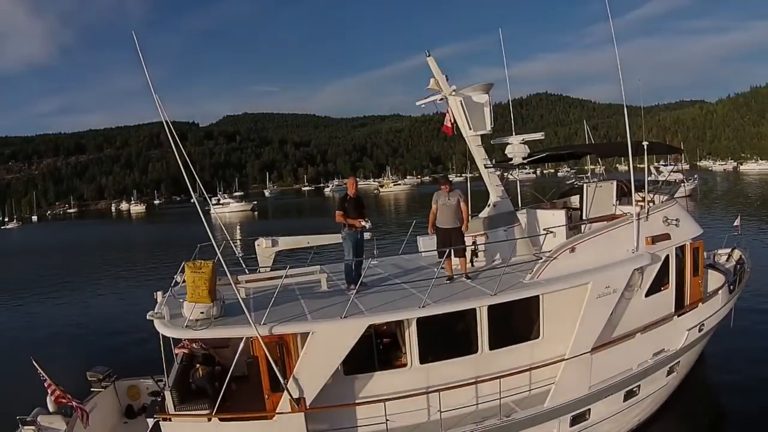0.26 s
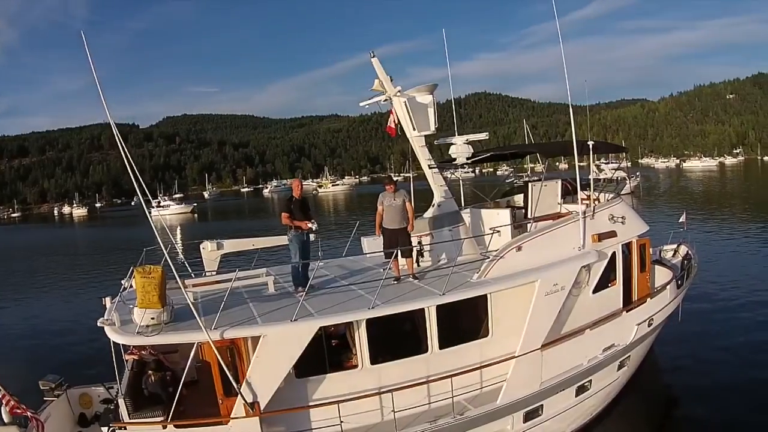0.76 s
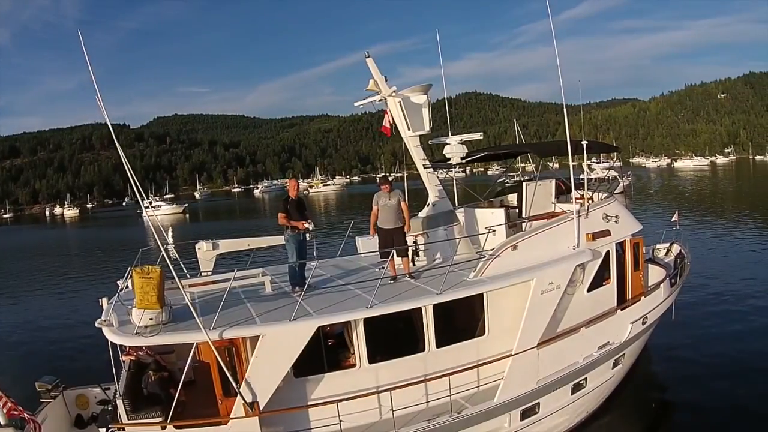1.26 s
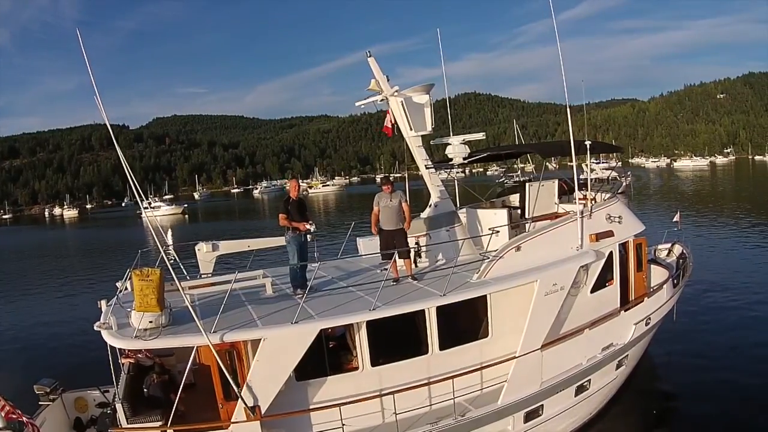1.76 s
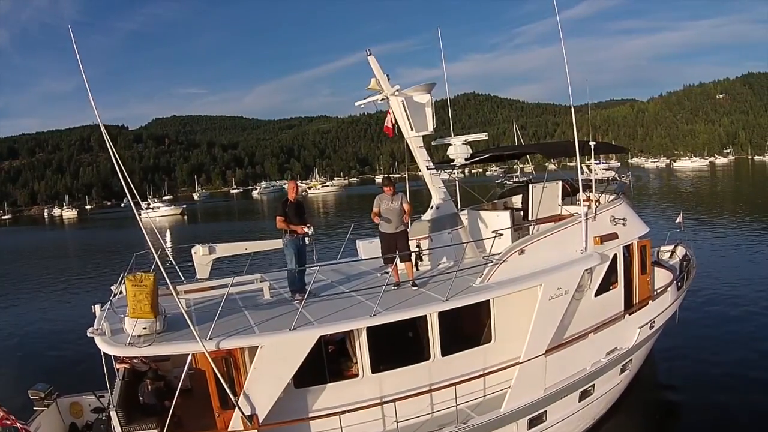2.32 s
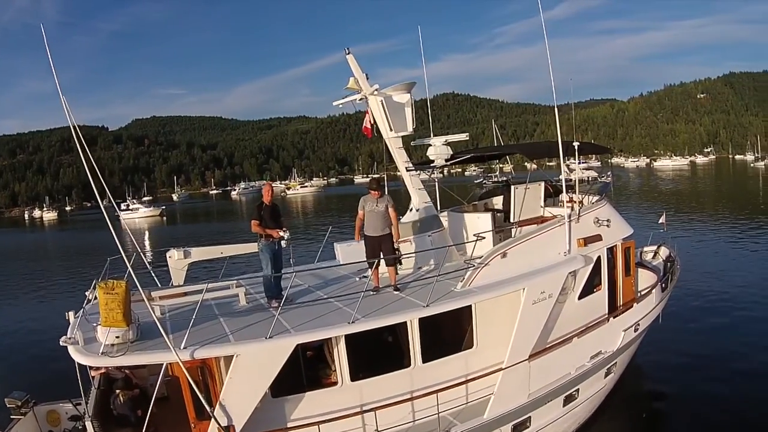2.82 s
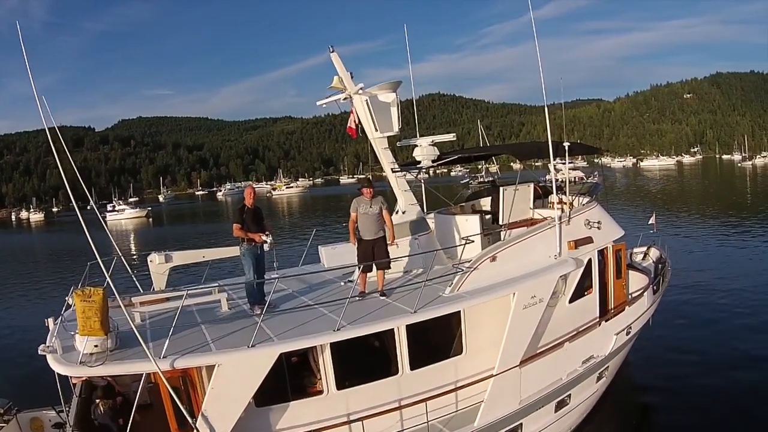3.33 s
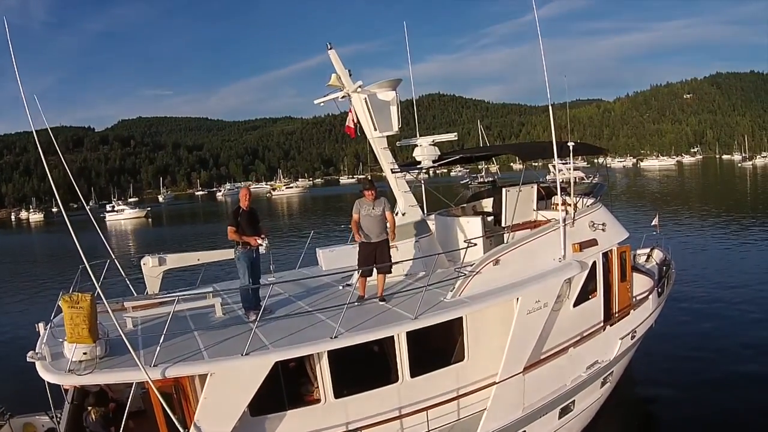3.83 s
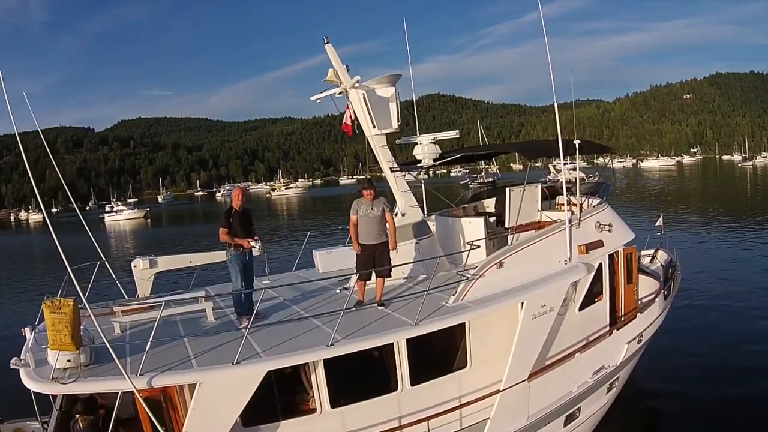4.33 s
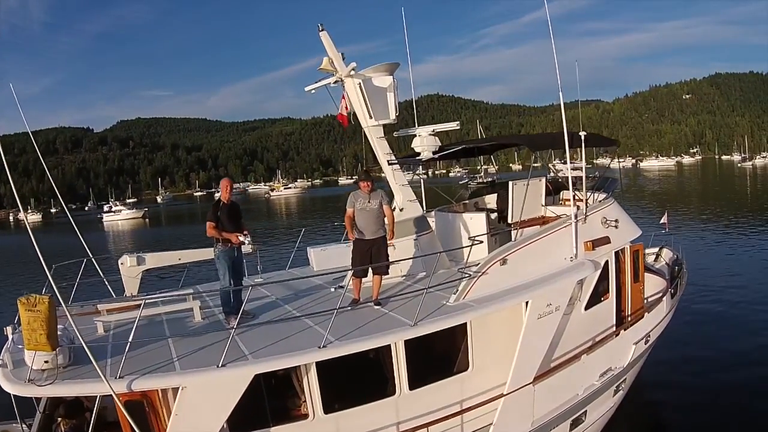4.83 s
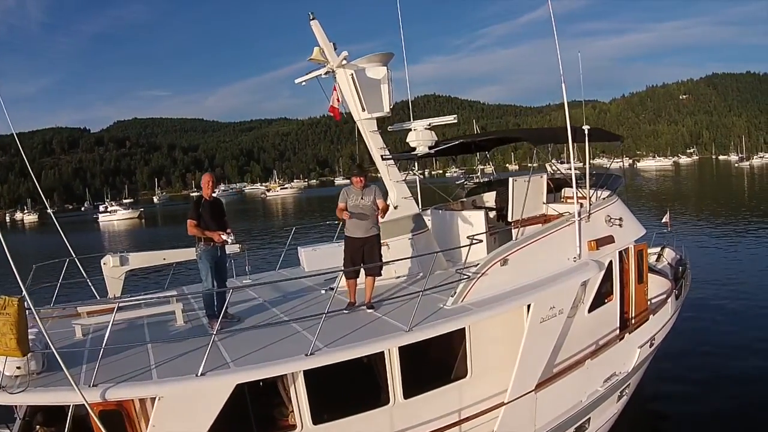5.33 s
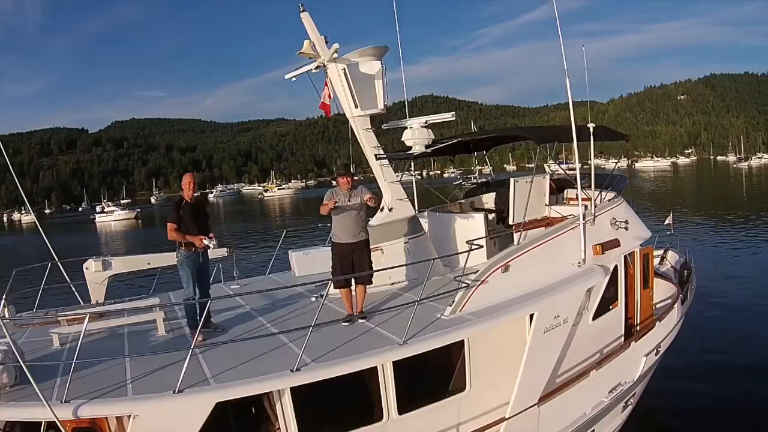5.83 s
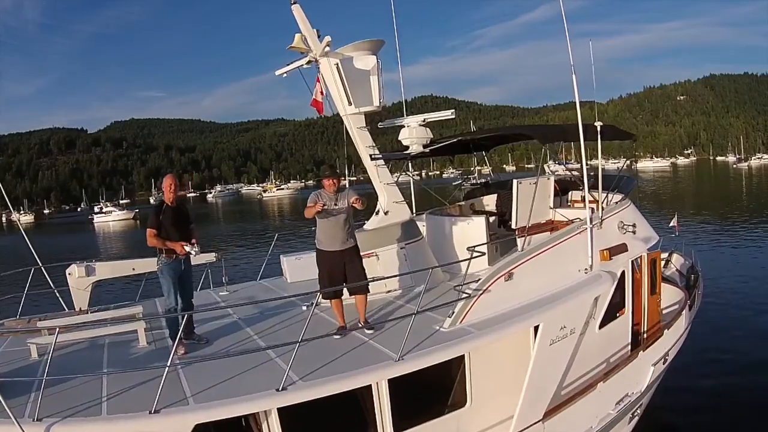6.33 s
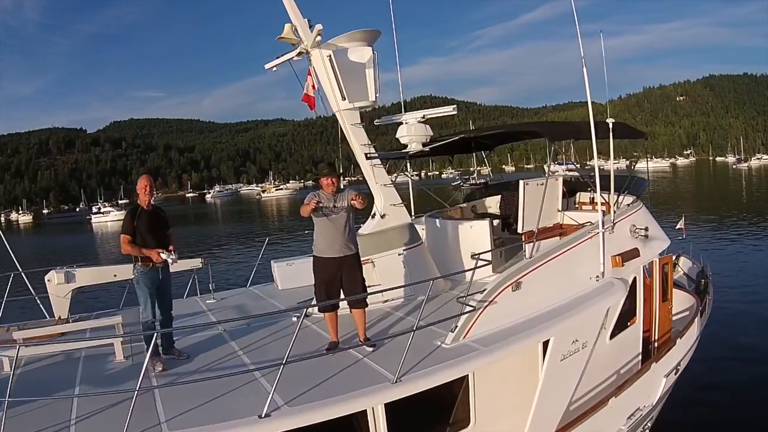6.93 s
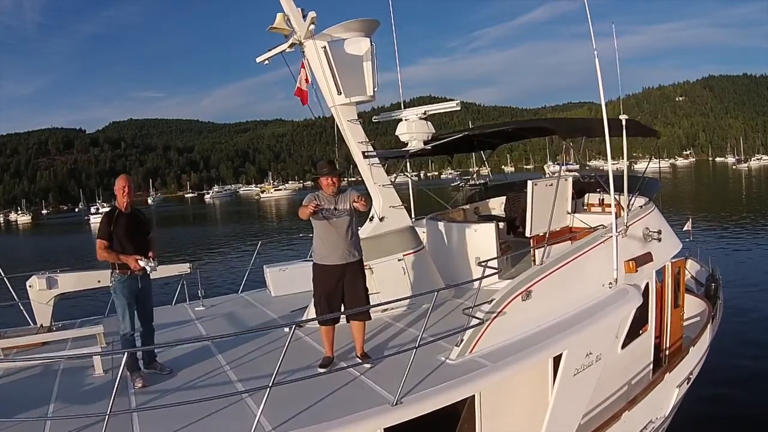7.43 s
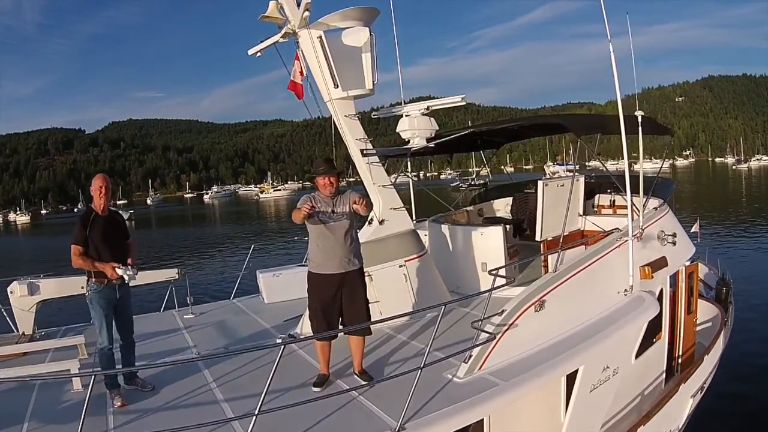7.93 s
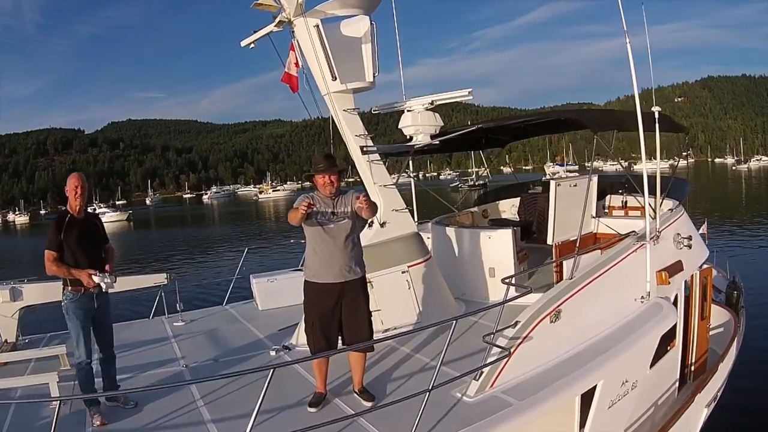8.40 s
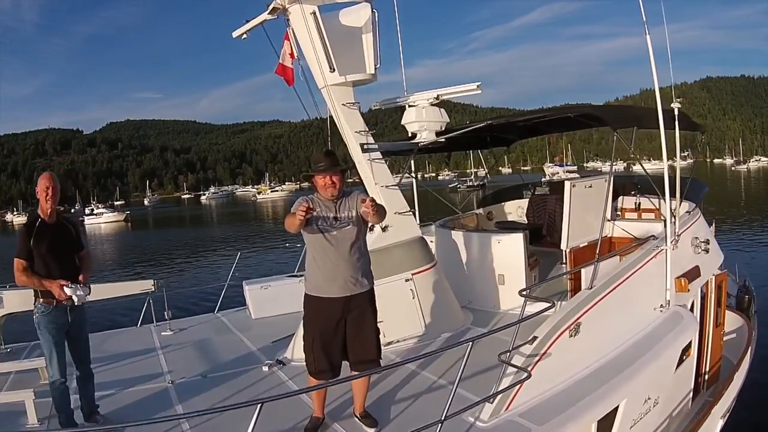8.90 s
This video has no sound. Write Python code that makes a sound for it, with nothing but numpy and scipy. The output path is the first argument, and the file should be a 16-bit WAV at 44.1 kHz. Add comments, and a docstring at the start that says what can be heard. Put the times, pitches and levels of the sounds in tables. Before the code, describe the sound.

Close, dry outdoor stereo sound of a helicopter-like rotor hovering. After initial silence it rises quickly to a steady, rapid chop with rounded thumps, crisp slaps and a soft rush of air. Low throbbing gusts come and go; blade hits alternate between tight and ragged. A very thin, slightly unsteady high whine stays in the background. It continues to the end without fading.

```python
"""A two-bladed rotor, by its sound a helicopter's, fades in and hovers close by, chopping almost eleven times a second.
Slaps and thumps: each blade cuts the tip vortex of the one before, sharp in steady air, smeared in a broken wake.
Below lie a throb of low multiples of the blade rate and the filtered-noise rush of the downwash.
A thin turbine whine, noise-modulated tones of drifting pitch, wanders on top."""
import sys
import numpy as np
from scipy import signal
from scipy.fft import rfft, irfft, next_fast_len
from scipy.io import wavfile
from scipy.ndimage import uniform_filter1d, minimum_filter1d

SR = 44100
rng = np.random.default_rng(int(sys.argv[2]) if len(sys.argv) > 2 else 0)


def digitize_waveform(pressure):
    """Quantize a signal to 16-bit integers and store it at the path in sys.argv[1].

    Rows of a 2-D input are taken as channels; values are limited to [-1, 1].
    """
    field = np.atleast_2d(pressure).T
    bounded = np.clip(field, -1, 1)
    quanta = np.round(bounded * 32767).astype(np.int16)
    wavfile.write(sys.argv[1], SR, quanta)


N = 403956

# slap colour at its usual centre: (frequency [Hz], relative density [dB per Hz])
SLAP_COLOUR = [(250, -10.5), (480, -13), (700, -3), (1200, -1), (1900, -5), (2700, -11.5), (3400, -23.5),
               (6000, -56.5)]
# strength of the downwash hiss: (time [s], level [dB])
HISS_FLOW = [(1.4, -47), (2.2, -44.5), (3.0, -44), (3.8, -43.5), (4.6, -43), (5.4, -44), (6.2, -45),
             (7.1, -45), (7.9, -46), (9.16, -45)]
# wake, tight or broken up: (time [s], spread of the vortex encounter [s])
WAKE_SPREAD = [(1.1, .002), (1.55, .0033), (2.0, .0024), (2.42, .0018), (2.55, .0038), (3.0, .004),
               (3.65, .0024), (4.05, .008), (4.85, .0085), (5.25, .0125), (6.05, .012), (6.26, .004),
               (6.45, .005), (6.6, .001), (7.15, .0016), (7.45, .0028), (8.1, .0018), (9.1, .003)]


def from_db(db):
    """Decibels to gain."""
    return 10 ** (np.asarray(db) / 20)


def rms_one(x):
    """The same signal at unit rms."""
    return x / np.sqrt(np.mean(x ** 2) + 1e-20)


def at_times(rows, times_s):
    """Each column of a curve at the given moments."""
    s, *columns = np.transpose(rows)
    return [np.interp(times_s, s, column) for column in columns]


def in_time(rows):
    """Each column of a curve, sample by sample."""
    return at_times(rows, np.arange(N) / SR)


def swells(rows):
    """Bell-shaped rises in level, sample by sample, in dB."""
    t = np.arange(N) / SR
    return sum(rise_db * np.exp(-((t - s) / half_s) ** 2) for s, half_s, rise_db in rows)


def colour(x, points):
    """Causal minimum-phase filter with the given spectrum, built from its folded cepstrum."""
    size = 2 * next_fast_len(len(x))
    hz, db = np.transpose(points)
    grid_hz = np.maximum(np.fft.rfftfreq(size, 1 / SR), 1)
    grid_db = np.interp(np.log(grid_hz), np.log(hz), db)
    cepstrum = irfft(np.log(from_db(grid_db)))
    cepstrum[1:size // 2] *= 2
    cepstrum[size // 2 + 1:] = 0
    response = np.exp(rfft(cepstrum))
    return irfft(rfft(x, size) * response)[:len(x)]


def shifted(points, ratio):
    """The same colour, higher or lower."""
    return np.array(points) * [ratio, 1]


def drift(rate_hz):
    """Slow chance at unit rms: white noise rolled off above the rate."""
    size = next_fast_len(N, True)
    hz = np.fft.rfftfreq(size, 1 / SR)
    white = rng.standard_normal(size)
    return rms_one(irfft(rfft(white) / (1 + (hz / rate_hz) ** 2))[:N])


def narrow_tone(hz, width_hz):
    """A tone whose height and phase wander, which widens its line."""
    phase = 2 * np.pi * np.cumsum(hz * np.ones(N)) / SR
    return rms_one(drift(width_hz) * np.cos(phase) + drift(width_hz) * np.sin(phase))


def stereo(mid, side):
    """Left and right from their shared and opposed parts."""
    return np.array([mid + side, mid - side])


def blade_turns(first_slap_s=0.85, blade_period_s=0.0934):
    """Blade passages counted sample by sample: an even rate, shifted a little by the sway."""
    # rotor sway: (time [s], delay of the slaps [s])
    sway = [(1.0, -.0003), (1.88, .0018), (2.3, -.0006), (3.1, -.0015), (3.45, -.0064), (4.5, -.0045),
            (4.7, -.0008), (6.4, -.0019), (7.2, .0001), (9.1, .0005)]
    delay_s, = in_time(sway)
    return (np.arange(N) / SR - delay_s - first_slap_s) / blade_period_s


def downwash(turns, rumble_db=-44.0, split_hz=480, swish_db=1.16, swish_lag_turns=0.16):
    """Rushing air: an even rumble, wide in the bass, under a lumpy hiss that swells with each blade."""
    # downwash colour: (frequency [Hz], relative density [dB per Hz])
    wash_colour = [(20, -28), (45, -3), (100, -0.5), (200, 1), (320, -5), (520, -16.5), (1000, -21.5),
                   (1850, -18.5), (2500, -23.5), (3600, -28), (4600, -30.5), (5600, -34), (6300, -38),
                   (7400, -36.5), (10000, -46), (11700, -44), (13000, -55), (14000, -53), (15300, -57)]
    width = [(45, 4), (120, -14), (300, -22.5), (1200, -25.5), (4000, -62), (14000, -26)]  # (Hz, side/mid dB)
    mid, side = (rms_one(colour(rng.standard_normal(N), wash_colour)) for part in range(2))
    air = stereo(mid, colour(side, width))
    rumble = signal.sosfiltfilt(signal.butter(2, split_hz, fs=SR, output="sos"), air)
    hiss = air - rumble
    flow_db, = in_time(HISS_FLOW)
    swell_db = swish_db * np.cos(2 * np.pi * (turns - swish_lag_turns))
    flutter_db = 1.2 * drift(60)
    return from_db(rumble_db) * rumble + from_db(flow_db + swell_db + flutter_db) * hiss


def stray_eddies(level_db=-14, spread_db=3, puffs_per_s=110, decay_per_s=600):
    """Small eddies puff at random as decaying noise, strongest while the wake is broken."""
    flow_db, = in_time(HISS_FLOW)
    spread_s, = in_time(WAKE_SPREAD)
    unrest = np.sqrt(np.clip(spread_s / spread_s.max(), 0, 1))
    sizes = from_db(spread_db * np.clip(rng.standard_normal(N), -2, 2))
    pops = (rng.random(N) < puffs_per_s / SR) * sizes
    envelope = signal.lfilter([1], [1, -np.exp(-decay_per_s / SR)], pops + 1e-18)
    puffs = envelope * rng.standard_normal(N)
    return unrest * from_db(flow_db + level_db) * rms_one(colour(puffs, SLAP_COLOUR))


def turbine(line_hz=14, skirt_hz=130, skirt_db=2.0, side_db=-11, trim_db=-1.5, gear_hz=4520, gear_db=-78):
    """Two compressor tones, each in a skirt of hiss, over faint gear tones."""
    # two compressor tones: (time [s], frequency [Hz], level before trim [dB])
    whine_high = [(.85, 8900, -72), (1.3, 9030, -71.5), (1.9, 9050, -73), (2.6, 9100, -73.5),
                  (3.3, 9045, -70), (4.0, 9040, -73), (4.5, 9050, -71), (5.2, 9115, -69.5),
                  (6.0, 9050, -74), (6.6, 9040, -73.5), (7.3, 9250, -92)]
    whine_low = [(4.0, 8700, -100), (4.4, 8730, -85), (5.0, 8800, -78), (5.6, 8740, -75.5),
                 (6.4, 8920, -80), (7.2, 8845, -70), (7.502, 8910, -72.5), (8.001, 8980, -71),
                 (8.601, 9030, -71.5), (9.16, 9100, -74)]
    # swell of the gear tone: (time [s], half length [s], rise [dB])
    gear_swells = [(3.86, 0.074, 13.7)]
    # steady gearbox tones: (frequency [Hz], level [dB], width [Hz])
    gearbox = [(5700, -80.5, 75), (6820, -83.5, 80), (7400, -84, 70)]
    out = from_db(gear_db + swells(gear_swells)) * narrow_tone(gear_hz, width_hz=13)
    for hz, db, width_hz in gearbox:
        out = out + from_db(db) * narrow_tone(hz, width_hz)
    for curve in (whine_high, whine_low):
        hz, db = in_time(curve)
        mid, side = (narrow_tone(hz, line_hz) + from_db(skirt_db) * narrow_tone(hz, skirt_hz)
                     for part in range(2))
        out = out + from_db(db + trim_db) * stereo(mid, from_db(side_db) * side)
    return out


def passages(turns, scatter_db=1.06, scatter_octaves=.11, spread_scatter=.25, jitter_share=.08, crack_db=-13.5):
    """Per blade: (s, thump dB, thump centre Hz, slap dB, slap centre Hz, crack dB, spread s)."""
    # thump as the blades take load: (time [s], level [dB], centre [Hz])
    load = [(.85, -39, 175), (1.5, -29, 187), (1.72, -30.5, 214), (2.0, -33.5, 195.7), (2.48, -30.5, 216),
            (2.9, -32.5, 200), (3.0, -40.5, 195), (3.85, -35, 199), (4.12, -37.5, 165), (4.8, -34.5, 190),
            (6.2, -36, 197), (6.5, -36.5, 195), (6.82, -33.5, 190), (7.2, -41, 200), (7.43, -35, 195),
            (7.9, -36.5, 176), (8.47, -28.5, 202), (9.0, -34.5, 195)]
    # slap as the blades bite into the vortex: (time [s], level [dB], centre [Hz])
    bite = [(.85, -40.5, 1200), (1.35, -36.5, 1560), (1.85, -38.5, 980), (2.17, -38, 1290),
            (2.44, -38, 1300), (2.55, -43, 1060), (2.75, -39, 1330), (2.97, -44.5, 1270),
            (3.25, -39.5, 1240), (3.65, -39.5, 1010), (3.93, -47.5, 1370), (4.38, -38.5, 1160),
            (5.1, -43, 1320), (6.4, -42, 1250), (7.15, -38, 1385), (7.65, -40, 1220), (8.35, -36.5, 1540),
            (8.85, -39, 1040)]
    s = np.searchsorted(turns, np.arange(int(turns[-1]) + 1)) / SR
    chance = rng.standard_normal((6, len(s)))
    thump_db, thump_hz = at_times(load, s)
    slap_db, slap_hz = at_times(bite, s)
    spread_s = at_times(WAKE_SPREAD, s)[0] * np.exp(spread_scatter * chance[0])
    slap_db = slap_db + scatter_db * chance[1]
    jittered_s = s + jitter_share * spread_s * chance[2]   # timing loosens with the spread
    thump_db = thump_db + scatter_db * chance[3]
    thump_hz = thump_hz * 2 ** (scatter_octaves * chance[4])
    slap_hz = slap_hz * 2 ** (scatter_octaves * chance[5])
    return np.transpose([jittered_s, thump_db, thump_hz, slap_db, slap_hz, slap_db + crack_db, spread_s])


def uneven_lumps(t, lumps_db, lump_s=.0015):
    """Random gain interpolated between independent lumps."""
    lumps = np.interp((t - t[0]) / lump_s, np.arange(len(t)), rng.standard_normal(len(t)))
    return from_db(lumps_db * lumps)


def burst(t, width_s, skirt_s, skirt_db, lumps_db=4.5):
    """Turbulence: noise that swells to the moment of the cut and dies as fast, in uneven lumps."""
    swell = np.exp(-abs(t) / width_s) + from_db(skirt_db) * np.exp(-abs(t) / skirt_s)
    return swell * uneven_lumps(t, lumps_db) * rng.standard_normal(len(t))


def strands(t, spread_s, reach=0.97, skirt_s=.011, skirt_db=-3.5, rise_share=0.5, lumps_db=3.5, count=5,
            shortest_s=.0012, growth=0.28, scatter_db=3.5):
    """Swell of a split vortex: a cut per strand, bunched or strung out by the spread, on a lumpy skirt."""
    places = (np.arange(count) + rng.random(count)) * 2 / count - 1
    moments_s = reach * spread_s * places
    sizes = from_db(scatter_db * rng.standard_normal(count))
    since_s = t - moments_s[:, None]
    away_s = np.where(since_s < 0, -since_s / rise_share, since_s)   # rises faster than it falls
    cuts = sizes @ np.exp(-away_s / (shortest_s + growth * spread_s))
    skirt = np.exp(-abs(t) / skirt_s) * uneven_lumps(t, lumps_db)
    return rms_one(cuts) + from_db(skirt_db) * rms_one(skirt)


def disperse(x, centre_hz=130, width_hz=170):
    """All-pass resonance: the lows around its centre arrive last, so a thump sweeps downward."""
    r = np.exp(-np.pi * width_hz / SR)
    poles = np.array([1, -2 * r * np.cos(2 * np.pi * centre_hz / SR), r * r])
    return signal.lfilter(poles[::-1], poles, x)


def blade_slaps(turns, size=4096, level_span_s=0.039, smear_s=0.011, thump_lead_s=.0015, shock_share=0.45,
                eddy_share=0.47, crack_shock_share=0.29, usual_thump_hz=195, usual_slap_hz=1282):
    """Every blade passage: one pressure pulse rings low, while the torn vortex slaps and cracks."""
    # thump at its usual centre, and crack: (frequency [Hz], relative density [dB per Hz])
    thump_colour = [(40, -18), (75, -7), (115, -2.5), (180, 1.5), (270, -1), (370, -8), (480, -21.5),
                    (900, -59)]
    crack_colour = [(1500, 8), (3200, 9.5), (4600, 4.5), (6300, -5.5), (8500, -14.5), (12000, -26),
                    (15500, -38)]
    # difference between the ears: (frequency [Hz], side over mid [dB])
    slap_width = [(50, -1.5), (120, -11), (250, -24.5), (600, -25.5), (1500, -42), (4000, -39),
                  (12000, -22)]
    t = (np.arange(size) - size // 2) / SR
    out = np.zeros(N + 2 * size)
    shock = rms_one(1. * (t == 0))
    for k, passage in enumerate(passages(turns)):
        s, thump_db, thump_hz, slap_db, slap_hz, crack_db, spread_s = passage
        spread_s = max(spread_s, .0015)
        ragged = spread_s / (spread_s + smear_s)   # a broken wake leaves less of the clean pulse
        clean = 1 - ragged

        pulse_s = np.searchsorted(turns, k) / SR - s - thump_lead_s   # free of the slap's jitter
        pulse = 1. * (np.arange(size) == np.searchsorted(t, pulse_s))
        low = shifted(thump_colour, thump_hz / usual_thump_hz)
        eddies = burst(t, width_s=0.0064 + spread_s / 2, skirt_s=0.013, skirt_db=10.5)
        ring = rms_one(disperse(colour(pulse, low)))
        thump = (eddy_share + ragged) * rms_one(colour(eddies, low)) - clean * ring

        swell = strands(t + spread_s / 8, spread_s)
        slap_tear = rms_one(swell * rng.standard_normal(size))
        high = shifted(SLAP_COLOUR, slap_hz / usual_slap_hz)
        slap = colour(slap_tear - shock_share * clean * shock, high)
        crack_tear = rms_one(swell * rng.standard_normal(size))
        crack = colour(crack_tear - crack_shock_share * clean * shock, crack_colour)

        blow = from_db(thump_db) * rms_one(thump)
        blow += from_db(slap_db) * rms_one(slap) + from_db(crack_db) * rms_one(crack)
        start = round(s * SR) - size // 2
        out[start:start + size] += blow * np.sqrt(level_span_s * SR / size)   # levels: rms over the span
    return stereo(out[:N], colour(out[:N], slap_width))


def blade_throb(turns, calm_db=-48, waver=0.46, wide_db=-51.5, lag_turns=0.204,
                buffet_hz=45, buffet_width_hz=7, buffet_db=-4):
    """Low multiples of the blade rate, very wide between the ears, and a deep buffeting among them."""
    # partials: (multiple of blade rate, mid re throb level [dB], side re wide_db [dB])
    throb_orders = [(2, -22, -17), (3, -23, -6), (4, -2.5, 9.5), (5, -8, 8.5), (6, -8, -10), (7, -7.5, -2)]
    # gusts that swell the shared part: (time [s], half length [s], rise [dB])
    gusts = [(1.55, 0.3, 6.5), (3.12, 0.09, 9), (4.5, 0.099, 5.5), (5.1, .07, 3), (5.57, 0.19, 8),
             (6.78, .11, 9.5), (7.49, .07, 8.5), (7.76, .11, 8.5), (9.0, 0.13, 3.5)]
    level_db = calm_db + swells(gusts)
    mid = from_db(level_db + buffet_db) * narrow_tone(buffet_hz, buffet_width_hz)
    side = 0
    for order, mid_db, side_db in throb_orders:
        # the deep wave trails the slap
        phase = 2 * np.pi * round(order) * (turns - lag_turns) + waver * drift(2.8)
        mid = mid + np.sqrt(2) * from_db(level_db + mid_db) * np.cos(phase)
        side_height = 1 + waver * drift(3.6)
        side = side + np.sqrt(2) * from_db(wide_db + side_db) * side_height * np.sin(phase)
    return stereo(mid, side)


def scene(fade_start_s=0.83, fade_length_s=1, fade_power=0.8):
    """Everything fades in together, the deep throb more slowly."""
    turns = blade_turns()
    fade = np.clip((np.arange(N) / SR - fade_start_s) / fade_length_s, 0, 1) ** fade_power
    air = downwash(turns) + stray_eddies()
    blades = blade_slaps(turns) + fade * blade_throb(turns)
    return fade * (air + turbine() + blades)


def record(dry, ceiling=0.13, size=45, stopband_hz=16500):
    """A fast limiter holds the tallest peaks; a steep low-pass cuts the top."""
    gain = np.minimum(1, ceiling / (abs(dry).max(axis=0) + 1e-9))
    gain = uniform_filter1d(minimum_filter1d(gain, size), size)
    low_pass = signal.cheby2(16, 80, stopband_hz, fs=SR, output="sos")
    return signal.sosfilt(low_pass, dry * gain)


dry = scene()
out = record(dry)
digitize_waveform(out)
```